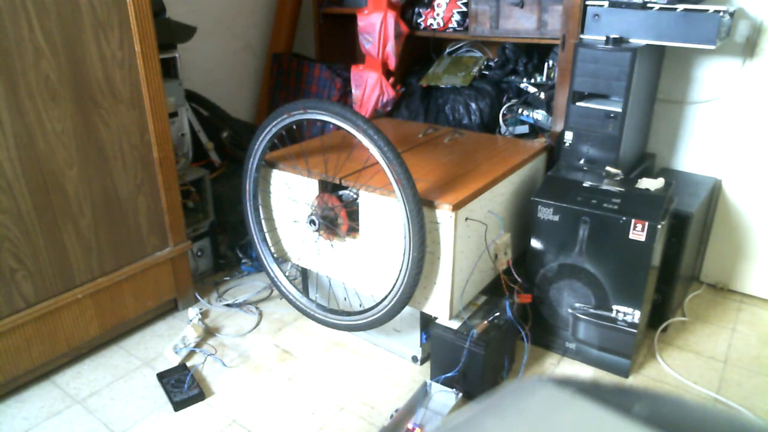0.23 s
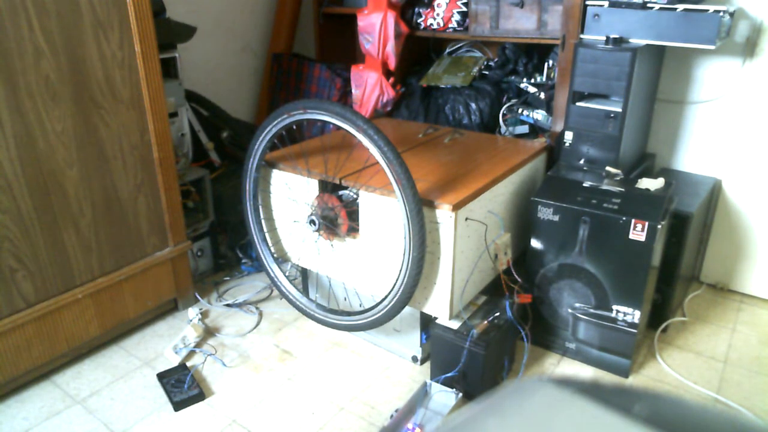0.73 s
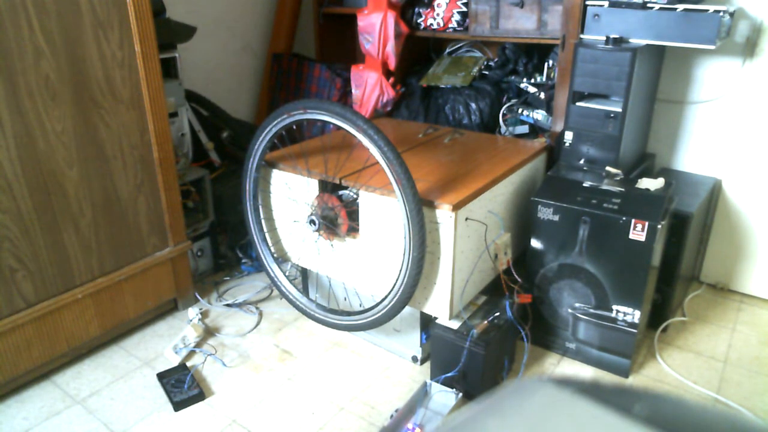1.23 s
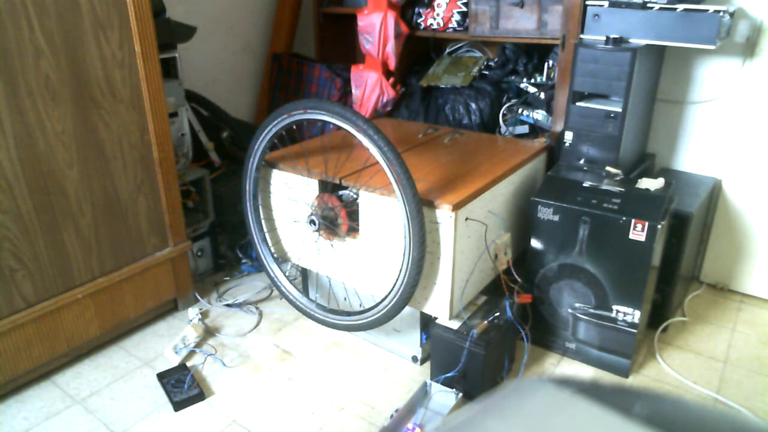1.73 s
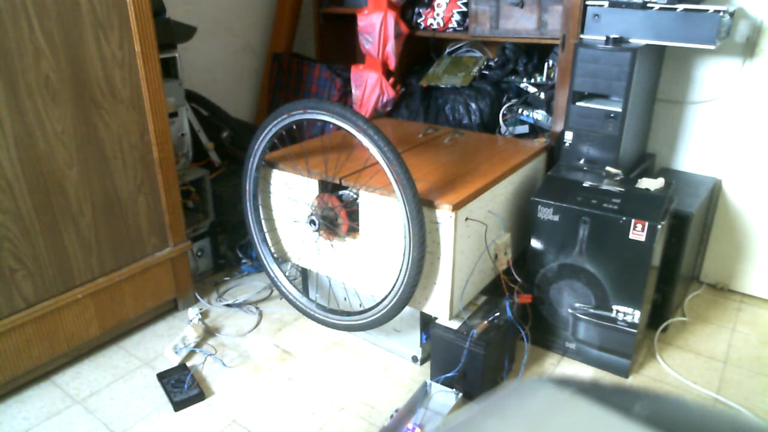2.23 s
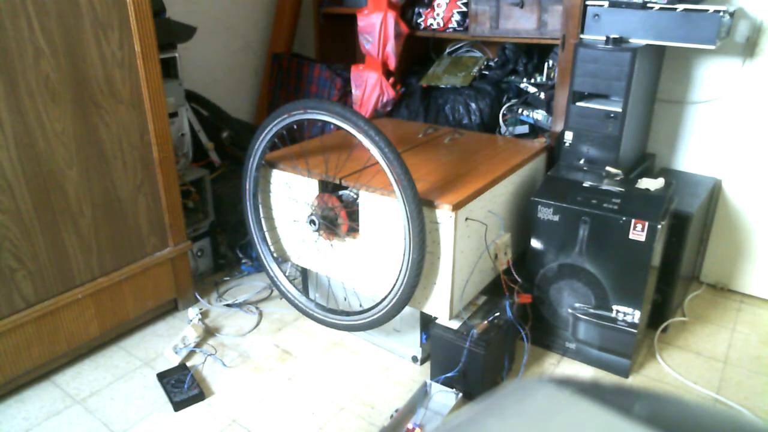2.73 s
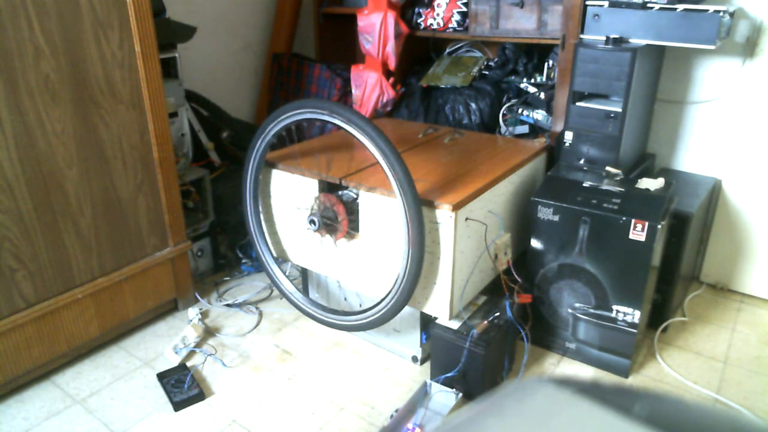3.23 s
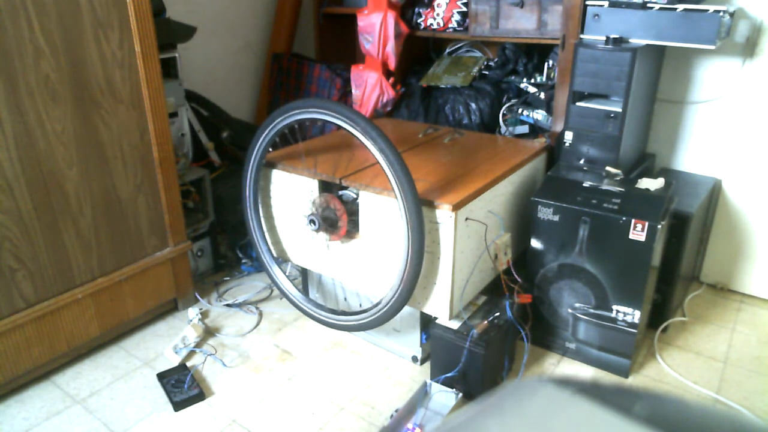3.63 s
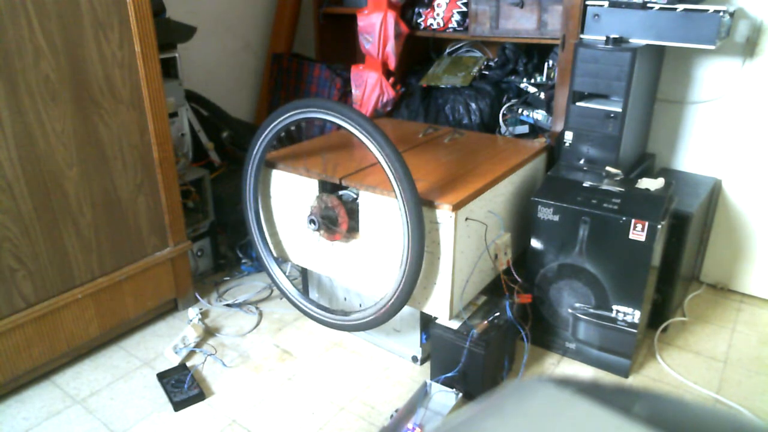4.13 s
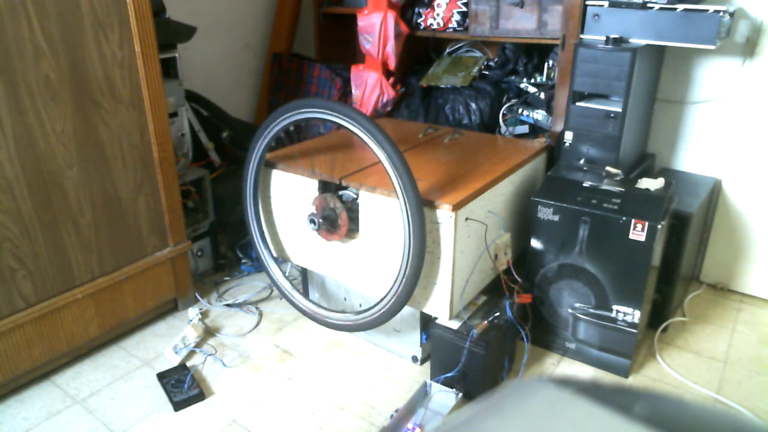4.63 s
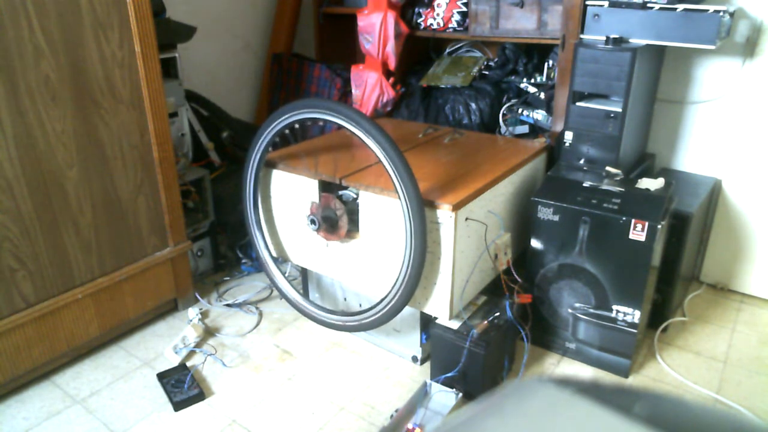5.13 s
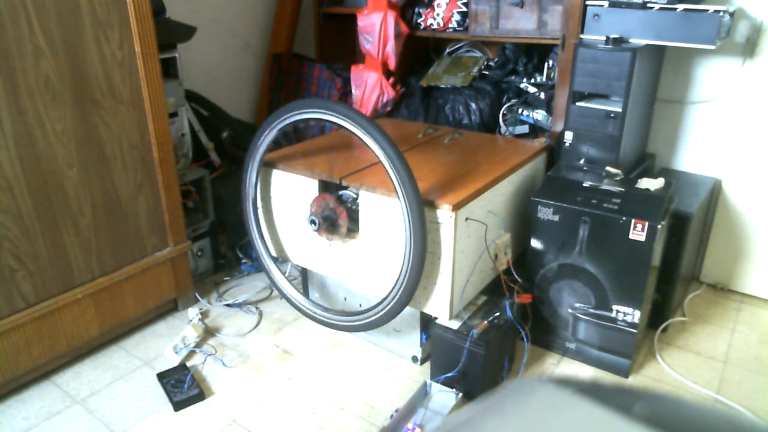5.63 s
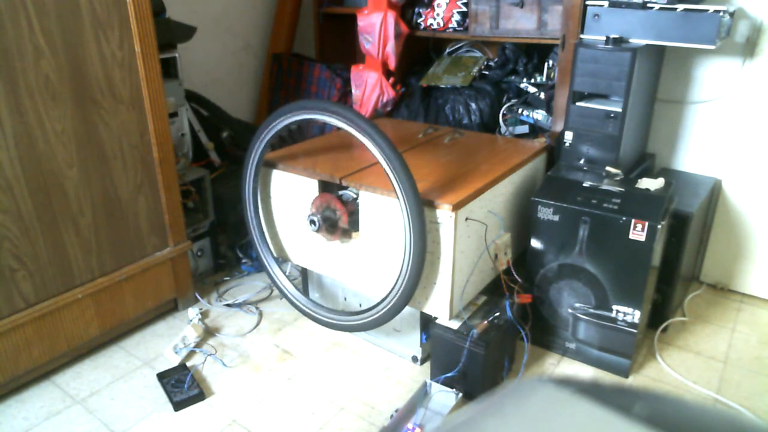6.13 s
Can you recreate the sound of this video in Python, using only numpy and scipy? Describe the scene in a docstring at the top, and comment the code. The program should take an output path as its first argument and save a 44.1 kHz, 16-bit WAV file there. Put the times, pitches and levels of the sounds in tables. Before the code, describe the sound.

Regular pairs of sharp relay clicks repeat over a low computer hum, rushing air and faint hiss in a cluttered workshop.

```python
"""Computers hum close by: two fans, a hard disk, rushing air and a thin power supply whine.
A soft rush swells and fades behind them. Across the small cluttered room, a timer relay pulls in
with a chatter and drops out with a snap, in a steady cycle, and sets its wooden box ringing.
Stray ticks and four single knocks dot the scene. A cheap microphone adds hiss and an offset."""
import sys
import numpy as np
from scipy import signal
from scipy.fft import rfft, irfft, next_fast_len
from scipy.io import wavfile
from scipy.ndimage import map_coordinates

SR = 44100
rng = np.random.default_rng(int(sys.argv[2]) if len(sys.argv) > 2 else 0)


def wrap_up_sound(samples):
    """Save the sound to the file named by the first command line argument, as 16-bit audio."""
    columns = np.atleast_2d(samples).T
    # keep every value between -1 and 1, then stretch to whole-number steps
    tamed = np.clip(columns, -1, 1)
    steps = np.round(tamed * 32767).astype(np.int16)
    wavfile.write(sys.argv[1], SR, steps)


N = 281446


def amp(db):
    """Gain of a level in dB."""
    return 10 ** (np.asarray(db) / 20)


def along(points, hz):
    """Read a curve of (Hz, value) points on a log frequency axis."""
    freqs, values = np.transpose(points)
    return np.interp(np.log(hz + 1), np.log(freqs + 1), values)


def wobble(rate):
    """A smooth random curve, rate knots a second."""
    knots = rng.standard_normal(int(N * rate / SR) + 4)
    return map_coordinates(knots, [np.arange(N) * rate / SR])


def filtered(x, response):
    """Pass x through a complex frequency response."""
    size = next_fast_len(len(x) + SR // 2)
    return irfft(rfft(x, size) * response(np.fft.rfftfreq(size, 1 / SR)), size)[:len(x)]


def noise(spectrum):
    """Noise shaped to (Hz, dB per Hz) points."""
    return filtered(rng.standard_normal(N), lambda hz: amp(along(spectrum, hz)) * np.sqrt(SR / 2))


def modes(rows):
    """A bank of (Hz, width Hz, dB) resonators in alternating polarity."""
    return lambda f: sum((-1) ** k * amp(db) * 1j * f * width / (hz * hz - f * f + 1j * f * width)
                         for k, (hz, width, db) in enumerate(rows))


def spikes(rows):
    """A track of impulses at (s, dB)."""
    track = np.zeros(N)
    for at, db in rows:
        track[round(at * SR)] += amp(db)
    return track


# Hum partials of each shaft: (multiple of the turning rate, level [dB rms])
BIG_FAN_PARTIALS = [(1, -41), (2, -57), (3, -52), (4, -57), (6, -70), (7, -59), (8, -68), (20, -73)]
SLOW_FAN_PARTIALS = [(1, -61), (2, -55), (3, -62), (5, -60), (6, -49), (7, -56), (8, -59), (9, -65),
                     (10, -67), (11, -69), (12, -54), (28, -67)]
DISK_PARTIALS = [(1, -38)]

def fans_and_disk():
    """Each shaft hums at multiples of its turning rate; higher partials waver more in phase."""
    def shaft(partials, hz, start_rad):
        angle = 2 * np.pi * hz * np.arange(N) / SR + start_rad + 0.0087 * wobble(0.55)
        return np.sqrt(2) * sum(amp(db + 0.24 * wobble(3.14)) * np.cos(k * angle) for k, db in partials)

    return (shaft(BIG_FAN_PARTIALS, hz=34.614, start_rad=.8)
            + shaft(SLOW_FAN_PARTIALS, hz=17.699, start_rad=3.25)
            + shaft(DISK_PARTIALS, hz=120.01, start_rad=1.2))


# Tones of the whine, in matching order: (pitch [Hz]) and (level [dB rms])
WHINE_PITCHES = (3300.3, 6570.5, 6600.5, 9870.7, 13171)
WHINE_LEVELS = (-84, -75, -76, -85, -80)

def power_supply():
    """The supply whines in thin, steady tones."""
    t = np.arange(N) / SR
    return np.sqrt(2) * sum(amp(db) * np.cos(2 * np.pi * (hz * t + rng.random()))
                            for hz, db in zip(WHINE_PITCHES, WHINE_LEVELS))


# Air bed, lifted near 110 Hz by the room: (frequency [Hz], level [dB per Hz])
AIR_SPECTRUM = [(15, -63.5), (35, -86), (60, -70), (85, -91), (110, -59.5), (135, -79), (180, -76),
                (260, -83), (550, -83.5), (850, -87.5), (1050, -96), (2000, -99), (3300, -101),
                (4200, -108)]

def rushing_air():
    """Air rushes through the computers: dark noise with a slight flutter."""
    return amp(0.31 * wobble(5.7)) * noise(AIR_SPECTRUM)


# Colour of the rush: (frequency [Hz], level [dB per Hz])
RUSH_SPECTRUM = [(300, -105), (600, -87), (900, -90.5), (1300, -97), (2500, -103), (4000, -112)]
# Its fader ride: (time [s], gain [dB])
RUSH_FADER = [(0, -11), (.5, 2), (.8, -14), (1.35, 1.5), (2.1, -6), (3, -6), (3.25, 4), (3.6, -9),
              (4.2, -1.5), (4.9, -9), (5.3, 3.5), (5.9, -9.5), (6.38, -3.5)]

def soft_rush():
    """A soft band of noise comes and goes, perhaps from a turning wheel."""
    swell_db = np.interp(np.arange(N) / SR, *np.transpose(RUSH_FADER))
    return amp(swell_db + wobble(11)) * noise(RUSH_SPECTRUM)


# Reverb time of the room: (frequency [Hz], t60 [s])
ROOM_DECAY = [(500, 0.7), (1500, 0.36), (4000, 0.36), (9000, 0.31), (15000, 0.17)]

def room_tail():
    """Half a second of reverb at unit energy; the highs die first."""
    hz, t, bands = signal.stft(rng.standard_normal(SR // 2), SR, nperseg=256)
    decay = amp(-60 * t / along(ROOM_DECAY, hz)[:, None])
    tail = signal.istft(bands * decay, SR, nperseg=256)[1][:SR // 2]
    return tail / np.linalg.norm(tail)


def room(wet_db, rise_s, snap_s, walls=()):
    """The room from one spot: a short scattered snap, any near walls, then a tail that builds and dies."""
    t = np.arange(SR // 2) / SR
    response = amp(wet_db) * (1 - np.exp(-t / rise_s)) * room_tail()
    for delay, db in [(0, 0), *walls]:
        burst = rng.standard_normal(SR // 10) * amp(-60 * t[:SR // 10] / snap_s)
        burst[0] = np.linalg.norm(burst)  # half the energy arrives as one clean front
        response[round(delay * SR):][:len(burst)] += amp(db) * burst / np.linalg.norm(burst)
    return response


# Armature travel, then contacts that meet and bounce: (delay [s], gain [dB])
PULL_CHATTER = [(.0012, 9), (.0052, 7.5), (.0068, 5.5), (0.01, -2), (0.0132, -22)]
# Body of the relay case: (frequency [Hz], width [Hz], pull-in gain [dB], drop-out gain [dB])
CASE_MODES = [(558, 240, 3.5, -9), (820, 180, 7, 10.5), (1110, 170, -1, 5), (1535, 330, 5.5, 9.5),
              (2900, 940, -3, 9.5), (3305, 620, 2.5, 13.5), (4940, 1270, 0.5, 7.5), (6420, 540, 4, 17),
              (7340, 370, 2, 18), (8020, 440, 4.5, 20), (11040, 1800, -2.5, 13.5)]
# Early reflections off surfaces near the relay: (delay [s], gain [dB])
REFLECTIONS = [(.0048, -7), (.0085, -7), (.01, -3), (.0125, -8)]
# The spring's dry edge on a drop-out: (frequency [Hz], width [Hz], gain [dB])
SNAP_MODES = [(6440, 800, 1), (7940, 900, 10), (13800, 1200, -2)]

def relay(first_pull_s=.2048, cycle_s=1.22675, hold_s=.2021, pull_db=-31, drop_db=-23):
    """The armature chatters in and snaps out; it stays in one place, so all clicks share one reverb."""
    pull_times = np.arange(first_pull_s, N / SR, cycle_s)
    drop_times = pull_times[pull_times + hold_s < N / SR] + hold_s
    pulls = spikes([(at + delay + rng.normal(0, .00003), pull_db + db + rng.normal(0, 1))
                    for at in pull_times for delay, db in PULL_CHATTER])
    drops = spikes([(at, drop_db + rng.normal(0, .5)) for at in drop_times])
    hz, width, pull_gains, drop_gains = np.transpose(CASE_MODES)
    case = filtered(pulls, modes(zip(hz, width, pull_gains)))
    case += filtered(drops, modes(zip(hz, width, drop_gains)))
    case = filtered(case, lambda f: 1 / (1 + 1j * f / 12000) ** 2)  # the plastic case muffles the top
    reverb = room(wet_db=9, rise_s=0.00093, snap_s=0.0024, walls=REFLECTIONS)
    clicks = signal.fftconvolve(case, reverb)[:N]
    return clicks + box_ring(pull_times, drop_times) + filtered(drops, modes(SNAP_MODES))


# Ring-out of box and spring: (pitch [Hz], pull-in level [dB], drop-out level [dB], t60 [s])
BOX_MODES = [(498, -43.5, -68, 0.09), (585, -57, -51, 0.17), (761, -44.5, -55, 0.53), (830, -38, -46, 0.18),
             (889, -45, -45, 0.27), (1139, -49, -56, 0.24), (1217, -50, -52.5, 0.24), (1606, -57, -71, 0.1),
             (1787, -50.5, -63, 0.098), (2480, -73, -48.5, 0.11), (3530, -75, -60, 0.36),
             (4930, -61.5, -64, 0.27), (5070, -52, -77, 0.34), (5200, -68, -72, 0.28),
             (5490, -53, -58.5, 0.28), (6430, -62, -47.5, 0.18), (7600, -70, -55, 0.46),
             (7660, -85, -49, 0.4), (8470, -72, -48, 0.29)]
# How hard each pull-in in turn rings the box: (gain [dB])
PULL_ACCENTS = [-1.5, -0.5, -0.5, 0, -4.5, 0.4]

def box_ring(pull_times, drop_times):
    """The wooden box and the relay's spring ring on after each blow, never quite alike."""
    t = np.arange(SR // 2) / SR
    rings = np.array([amp(-60 * t / t60) * np.sin(2 * np.pi * hz * t) for hz, _, _, t60 in BOX_MODES])
    rings *= 1 - np.exp(-t / 0.0016)  # soft attack
    _, pull_levels, drop_levels, _ = np.transpose(BOX_MODES)
    blows = [(at, pull_levels + accent) for at, accent in zip(pull_times, PULL_ACCENTS)]
    blows += [(at, drop_levels) for at in drop_times]
    track = np.zeros(N + SR)
    for at, levels in blows:
        gains = amp(levels + rng.normal(0, 1.9, len(rings)))
        track[round((at + .004) * SR):][:len(t)] += gains @ rings  # the box answers 4 ms late
    return track[:N]


def one_shot(at, db, wet_db, snap_s, rings):
    """A small hit with its own room path; two passes through its resonators double their dB gains."""
    ring = modes(rings)
    hit = filtered(room(wet_db, rise_s=0.002, snap_s=snap_s), lambda f: ring(f) ** 2)
    track = np.zeros(N + SR)
    track[round(at * SR):][:len(hit)] = amp(db) * hit
    return track[:N]


# Cues for the faint ticks: (time [s], gain [dB], pitch [Hz])
TICK_CUES = [(.3785, -16, 2230), (.731, -22.5, 1660), (2.202, -21, 1800), (2.372, -24, 1870),
             (3.6, -21, 1740), (4.51, -19, 1450), (4.916, -23, 1960), (5.82, -24.5, 1500)]

def ticks(width_hz=740, upper_ratio=1.73):
    """Faint ticks, perhaps from the wheel, each with a main ring and a weaker one above."""
    track = np.zeros(N)
    for at, db, hz in TICK_CUES:
        rings = [(hz, width_hz, 0), (upper_ratio * hz, width_hz, -9)]
        track += one_shot(at, db, wet_db=6, snap_s=.005, rings=rings)
    return track


# Voice of each knock: (frequency [Hz], width [Hz], gain per pass [dB])
CLACK = [(1430, 720, -2.5), (2440, 850, -0.5), (3750, 1300, 1), (5470, 1000, 0), (6700, 1200, 1.5),
         (9350, 2800, -3.5), (12300, 2700, -5)]
THUMP = [(45, 30, 0), (63.7, 18, -2)]
PING = [(3510, 270, 2), (5000, 1200, -9), (8150, 930, 0), (11200, 1800, -8)]
BUMP = [(335, 180, -.4), (510, 290, 0)]
# Their cues, in that order: (time [s], gain [dB], reverb send [dB], snap t60 [s])
KNOCK_CUES = [(1.873, -8.5, 8.5, .0098), (1.924, 2, 11, .05), (3.416, -9, -3, 0.0049),
              (5.367, 1, -3, 0.035)]

def knocks():
    """Small things snap, knock or settle: a clack, a low thump, a ping and a soft bump."""
    return sum(one_shot(*cue, rings) for cue, rings in zip(KNOCK_CUES, (CLACK, THUMP, PING, BUMP)))


def scene():
    """The mono mix at the microphone: the computer bed, with the rush and the hits on top."""
    computers = fans_and_disk() + power_supply() + rushing_air()
    return (computers + soft_rush() + relay() + knocks() + ticks())[None]


# Noise floor of the preamplifier: (frequency [Hz], level [dB per Hz])
HISS_SPECTRUM = [(500, -104), (4000, -105), (7000, -104), (9500, -105), (11500, -103), (13500, -101),
                 (16000, -100)]

def record(dry):
    """A cheap microphone: preamplifier hiss, a brick-wall high cut and a steady offset."""
    high_cut_hz, offset = 15780, -.0261
    hissy = dry[0] + noise(HISS_SPECTRUM)
    return filtered(hissy, lambda hz: hz < high_cut_hz)[None] + offset


dry = scene()
out = record(dry)
wrap_up_sound(out)
```